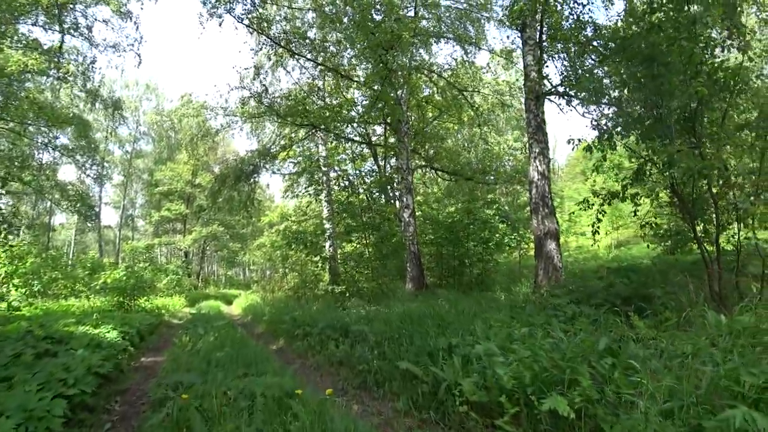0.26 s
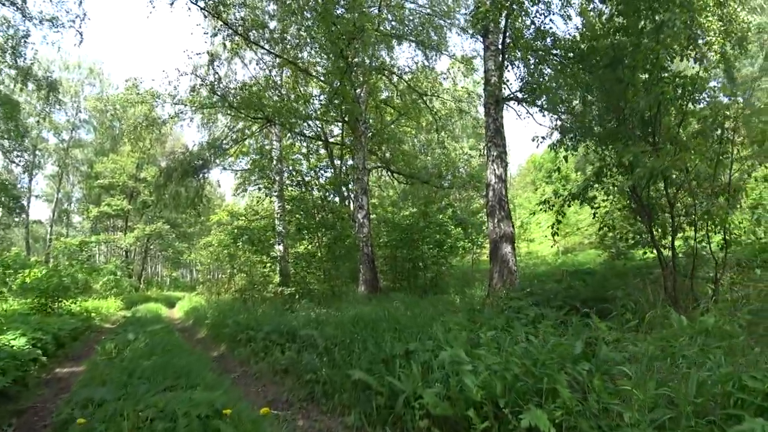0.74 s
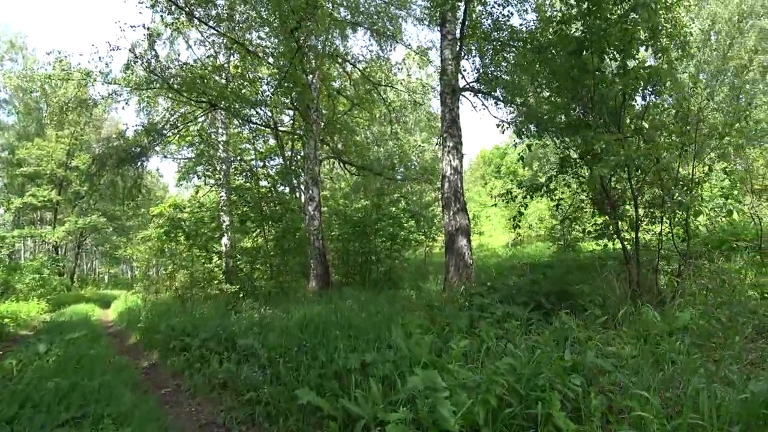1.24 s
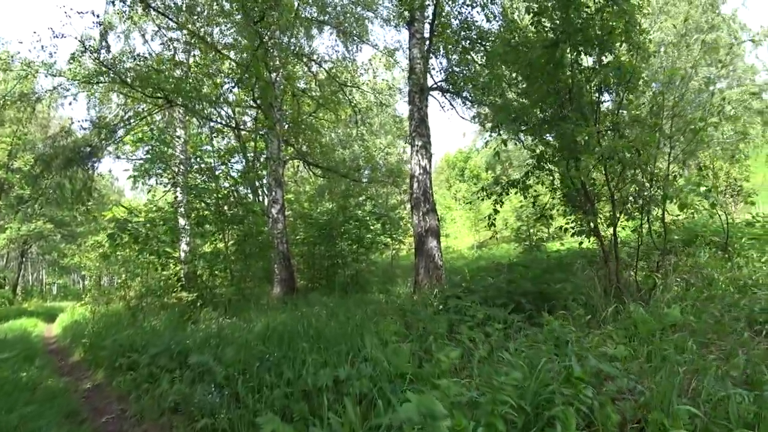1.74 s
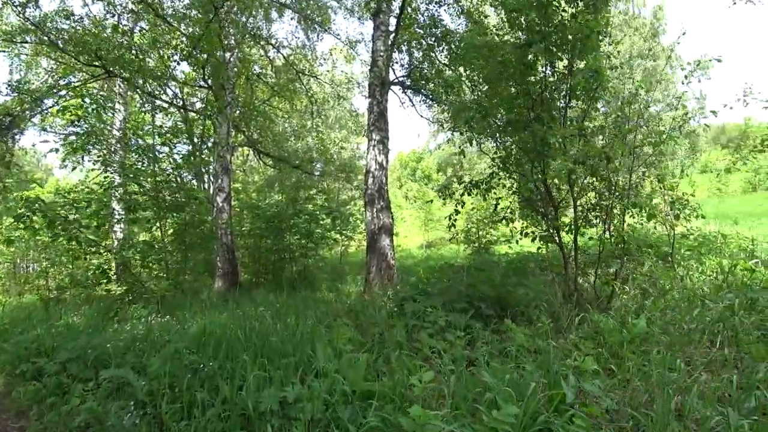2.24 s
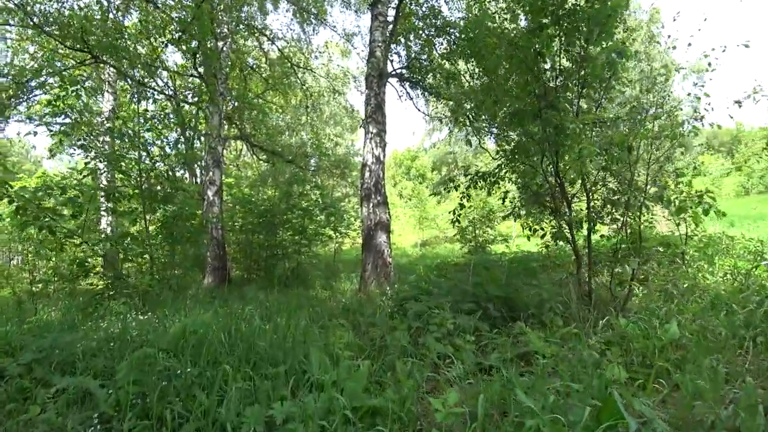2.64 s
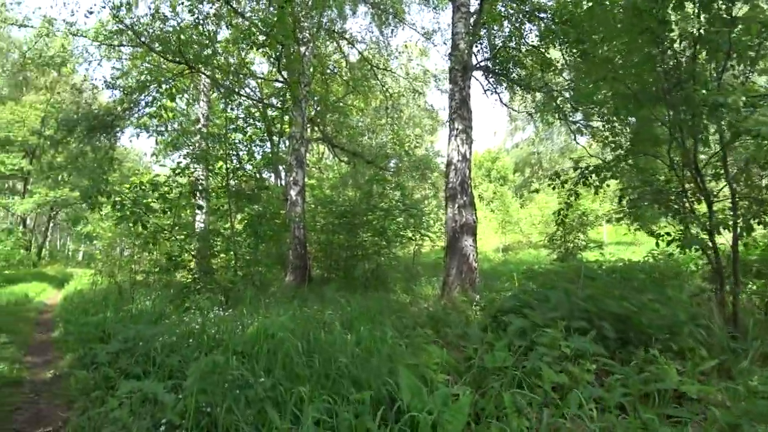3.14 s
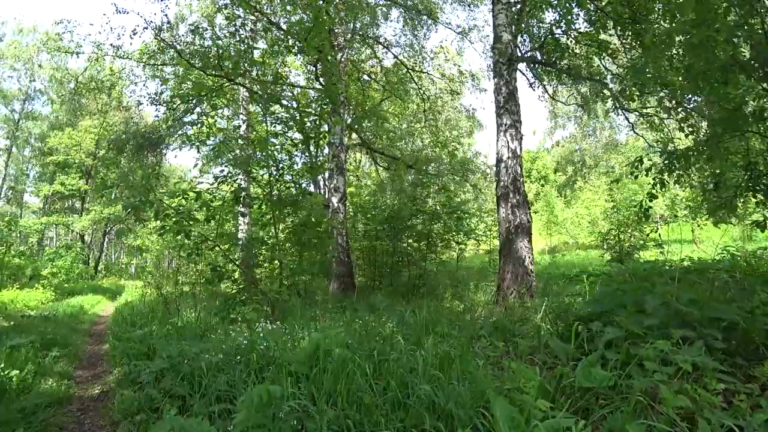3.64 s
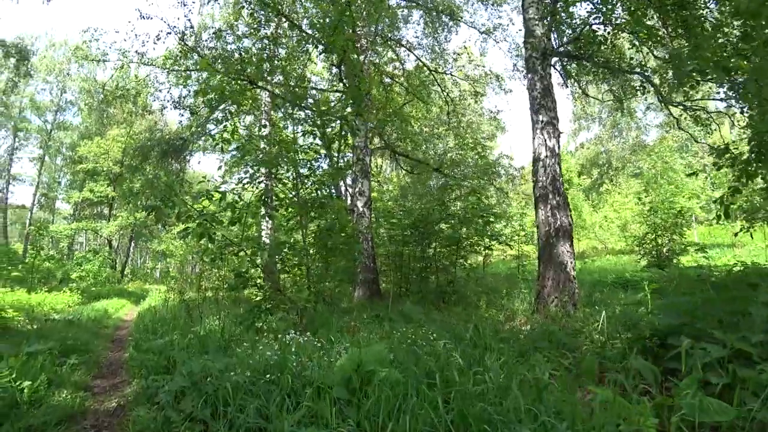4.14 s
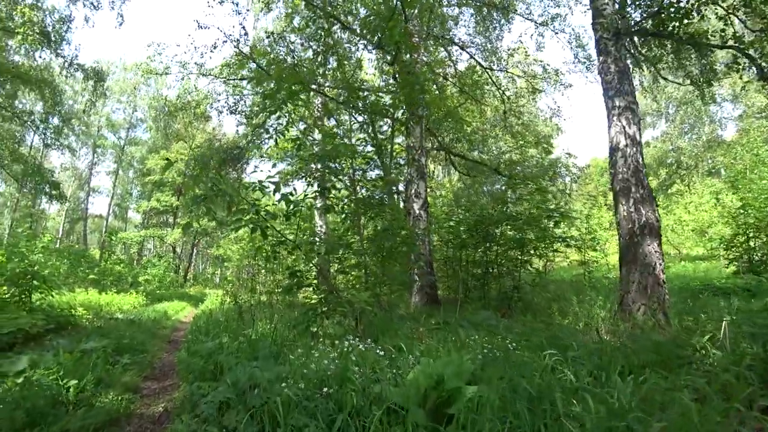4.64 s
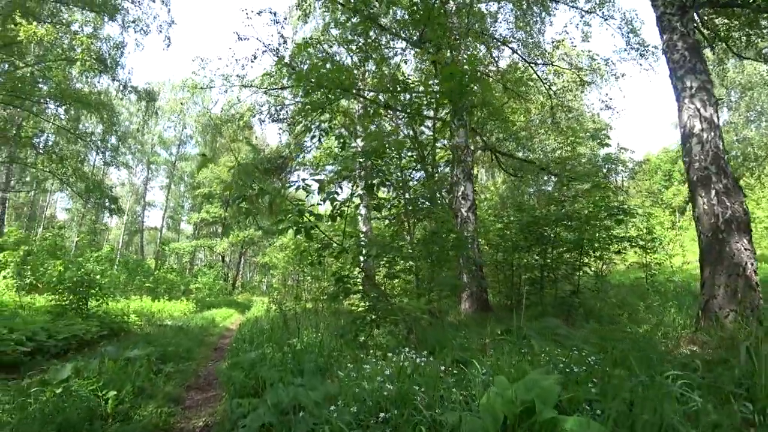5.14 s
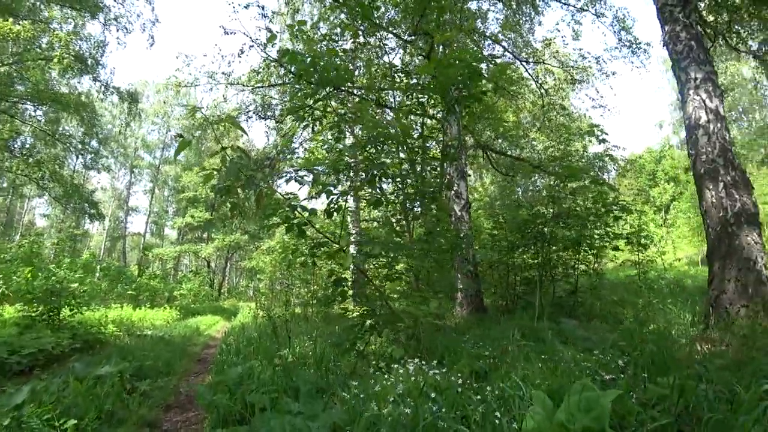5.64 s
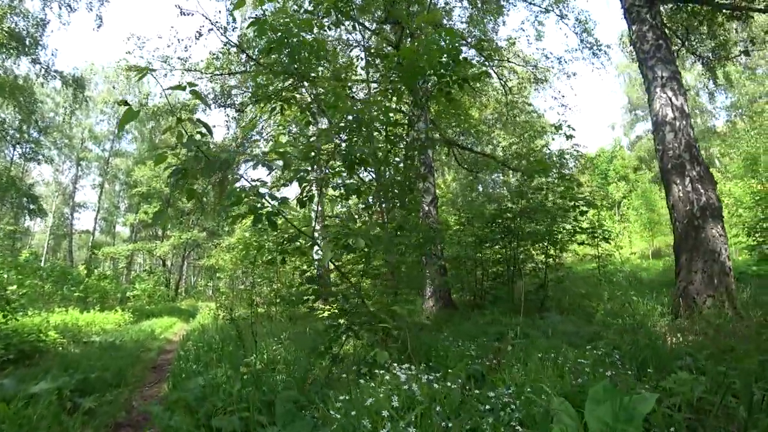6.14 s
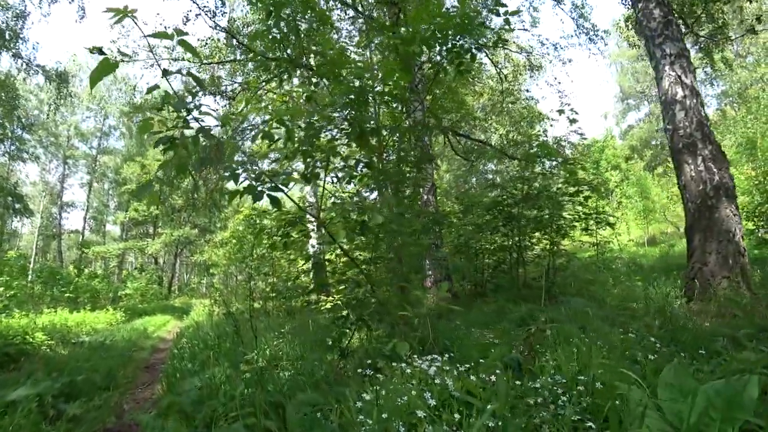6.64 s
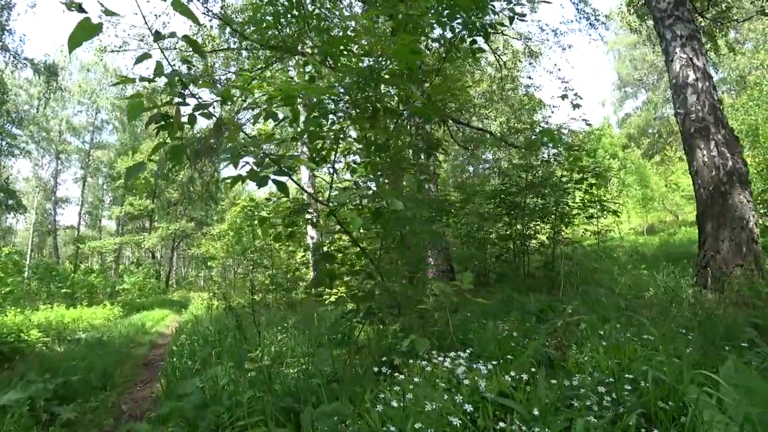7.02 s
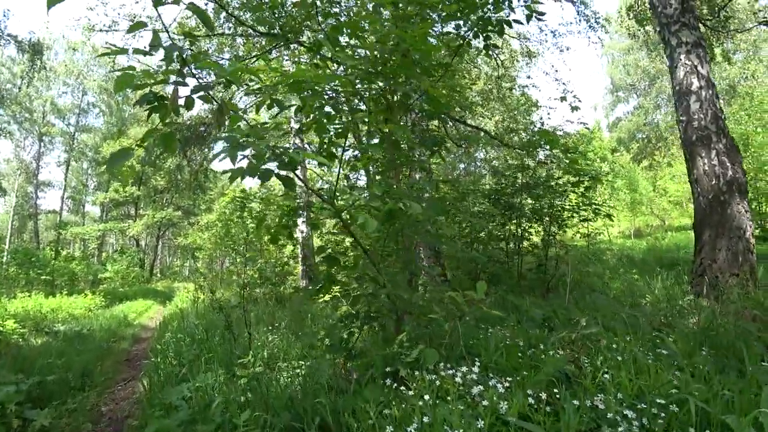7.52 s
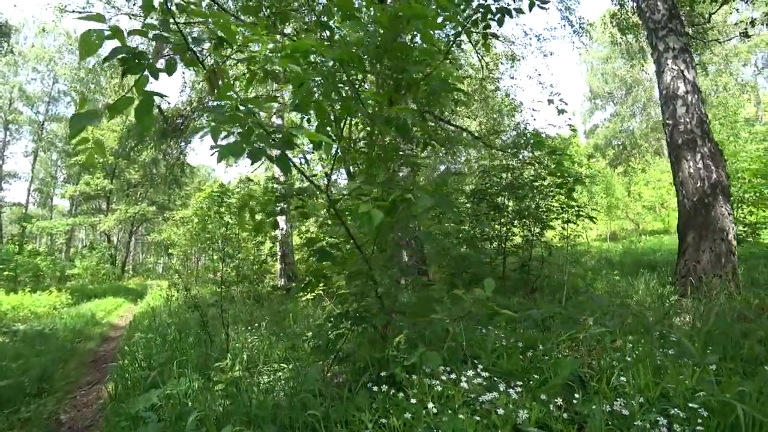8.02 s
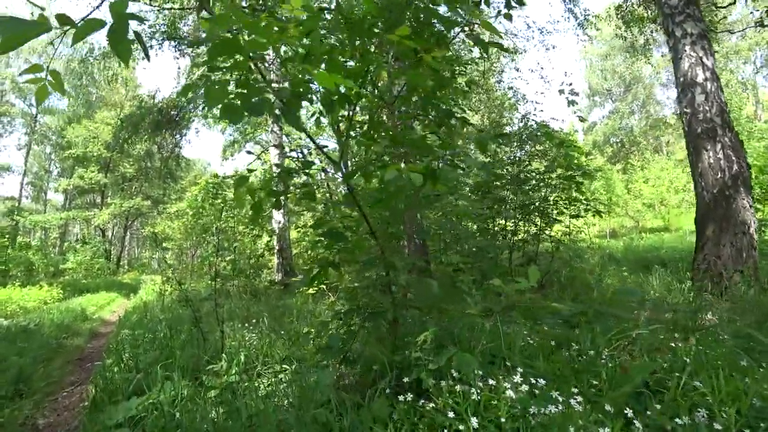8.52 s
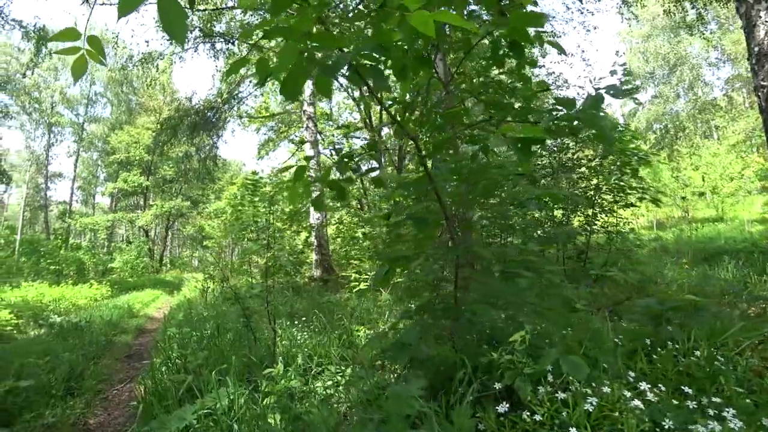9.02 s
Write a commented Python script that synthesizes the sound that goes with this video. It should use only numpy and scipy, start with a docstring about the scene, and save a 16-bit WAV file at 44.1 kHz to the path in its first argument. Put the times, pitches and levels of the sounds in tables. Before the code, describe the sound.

Someone wades through tall grass at the edge of a wood, heard from a hand-held stereo microphone just above the plants. From the start, blades hiss and leaves rustle against the legs while stems snap crisply. The wading is busiest from about 1.3 to 2.6 seconds, with dry litter and twigs crunching underfoot. Around 3 seconds a distant bird gives one faint, falling whistle during another swish, and stems crack at 3.4. From about 3.7 seconds the movement slows to light brushes, with a small snap at 4.5. Careful steps crunch twigs and stems at about 6.2, 6.5 and 7.1 seconds. Soft, low handling bumps follow from 7.3 to 7.8, and again at 9.2. Fainter crunches come between 8.5 and 9.1 seconds. Throughout, wind washes softly and evenly through far treetops, and a very faint, high electronic whine sits at the microphone.

```python
"""The edge of a wood, in tall grass, heard from the stereo microphone of a hand-held camera.
Just below it someone wades through the plants, then slows to a few careful steps: blades hiss and
leaves rustle against the legs, stems snap, and dry litter and twigs crunch under the soles.
Right at the microphone the camera whines and is bumped softly by the hand.
Far off, wind washes through the trees and a bird whistles once."""
import sys
import numpy as np
from scipy import signal
from scipy.fft import rfft, irfft
from scipy.io import wavfile
from scipy.ndimage import uniform_filter1d

SR = 44100
rng = np.random.default_rng(int(sys.argv[2]) if len(sys.argv) > 2 else 0)


def master_out(mix):
    """Clip the mix to full scale and print it as 16-bit PCM to the path in sys.argv[1]."""
    frames = np.transpose(np.atleast_2d(mix))
    ceiling = np.clip(frames, -1, 1)
    pcm = np.round(ceiling * 32767).astype(np.int16)
    wavfile.write(sys.argv[1], SR, pcm)


N = 408807
TIME, FREQS = np.arange(N) / SR, np.fft.rfftfreq(N, 1 / SR)


# a leg sweeps through the plants: (start [s], length [s], level [dB], blades over leaves [dB])
LEG_SWEEPS = [(0.1, 0.02, -49, -2), (0.22, 0.027, -52, -10), (0.326, 0.025, -50.5, 2),
              (0.408, 0.22, -50.5, 2), (0.654, 0.28, -49, 0), (0.664, .025, -49, -1),
              (0.953, 0.17, -58, -2), (1.238, 0.05, -55, 5), (1.282, 0.13, -46.5, 3.5),
              (1.346, 0.18, -45, -1), (1.546, 0.17, -44.7, -4), (1.707, 0.12, -46, -1),
              (1.86, 0.27, -52, 2), (1.99, 0.019, -43.5, 8), (2.14, 0.31, -46, -3),
              (2.466, 0.11, -48.5, -5), (3.014, 0.28, -47.5, 7), (3.249, 0.16, -46.5, 2.5),
              (3.425, 0.23, -60, 6), (3.754, 0.34, -62, -4), (4.141, 0.022, -55, -3),
              (4.478, 0.024, -51.5, -2.5), (4.67, 0.088, -58.5, 17), (5.329, 0.065, -54, -8),
              (5.41, 0.1, -57.5, -7), (5.767, 0.031, -54, 6), (6.422, 0.073, -50, -3),
              (6.51, 0.13, -65, -12), (6.973, 0.039, -53.5, 7), (7.127, .065, -52, -10),
              (7.766, 0.046, -58, -4), (8.983, 0.037, -51, -6), (9.042, 0.28, -60.5, -13)]
# a foot presses a tuft flat: (heaviest moment [s], level [dB], blades over leaves [dB])
TUFT_TREADS = [(1.485, -44.5, 15), (2.237, -40, -0.5), (6.213, -47, -11), (7.07, -46, -5)]

def contacts(attack_s=0.021, swell_db_per_s=0.5, release_s=0.028, press_s=0.052, ease_s=0.066):
    """Yields each touch of the plants as (amplitude over time, blades over leaves [dB])."""
    stirring_db = np.interp(TIME, (3.5, 4.7), (-58.5, -71.5))  # constant stir, less as the wading slows
    yield gain_of(stirring_db), -5
    for start, length, db, blades_db in LEG_SWEEPS:
        t = np.maximum(TIME - start, 0)
        catch = np.minimum(t / attack_s, 1)
        spring_back = np.exp(-np.maximum(t - length, 0) / release_s)
        yield catch * spring_back * gain_of(db + swell_db_per_s * (t - length / 2)), blades_db
    for s, db, blades_db in TUFT_TREADS:
        pressure = np.exp(np.minimum((TIME - s) / press_s, (s - TIME) / ease_s))
        yield gain_of(db) * pressure, blades_db


# thin grass blades, close up: (frequency [Hz], gain [dB])
BLADE_COLOUR = [(300, -54), (1500, -23), (3500, -5), (5500, -2.5), (7200, -0.5), (8200, -3), (9200, -6),
                (11000, -9)]
# broad leaves, close up: (frequency [Hz], gain [dB])
LEAF_COLOUR = [(80, -55), (200, -18.5), (500, -11), (1100, -2), (2000, -1.5), (3300, -0.5), (5000, -5),
               (7500, -6.5), (11000, -22)]
# nearby plants at the two microphone ports: (frequency [Hz], left-right likeness [0..1])
NEAR_LIKENESS = [(100, 0.86), (600, 0.79), (1200, 0.84), (2800, 0.96), (6000, 0.93), (8500, 1),
                 (11000, 0.39)]
# nearby plants reach the left port first: (frequency [Hz], phase lead [rad])
NEAR_LEAD = [(100, .1), (1000, 0.24), (2700, 0.12), (6500, .3), (8200, 0.97), (11000, 0.98)]

def brushing(swish_db=-0.11, tick_db=-64, tick_growth=0.59, usual_db=-50):
    """Blades hiss and leaves rustle against the legs; in gentle contact single stalks tick out."""
    blade_power, leaf_power = np.zeros((2, N))
    for level, blades_db in contacts():
        leaf_share = 1 / (1 + gain_of(blades_db) ** 2)
        blade_power += (1 - leaf_share) * level ** 2
        leaf_power += leaf_share * level ** 2
    strength_db = 10 * np.log10(blade_power + leaf_power)
    blades = rustle(BLADE_COLOUR, per_s=2200, spread_db=1.3, ring_s=0.00018, rub_db=-0.5)
    leaves = rustle(LEAF_COLOUR, per_s=2000, spread_db=4.0, ring_s=0.00096, rub_db=2.5)
    stalks = ports(grains(per_s=220, spread_db=4.5, ring_s=0.00017), BLADE_COLOUR, NEAR_LIKENESS)
    swish = gain_of(swish_db) * (np.sqrt(blade_power) * blades + np.sqrt(leaf_power) * leaves)
    return swish + stalks * gain_of(tick_db + tick_growth * (strength_db - usual_db))


def rustle(colour, per_s, spread_db, ring_s, rub_db, clump_db=1.5):
    """Grains over smooth rubbing, arriving in clumps as tufts catch and slip free."""
    friction = grains(per_s, spread_db, ring_s) + gain_of(rub_db) * rng.standard_normal((2, N))
    clumped = tuft_patches(friction) * gain_of(clump_db * drift(rate_hz=38))
    return ports(clumped, colour, NEAR_LIKENESS, curve(NEAR_LEAD))


def grains(per_s, spread_db, ring_s, fibre_kinds=16):
    """Tiny slips and fractures of uneven size; every kind of fibre has its own brief ring."""
    t, out = np.arange(256) / SR, np.zeros((2, N))
    for _ in range(fibre_kinds):
        slips = rng.random(N) < per_s / fibre_kinds / SR
        clicks = slips * gain_of(spread_db * np.minimum(rng.exponential(1, N), 4))
        rings = unit_rms(rng.standard_normal((2, len(t))) * np.exp(-t / ring_s))
        out += signal.oaconvolve(clicks[None], rings, axes=1)[:, :N]
    return unit_rms(out - out.mean(1, keepdims=True))


def tuft_patches(x, patchy_db=1.5):
    """Each tuft has a colour of its own: random patches, about 15 ms long and 1.5 kHz wide."""
    spectra = signal.stft(x, nperseg=256)[2]
    patches = rng.standard_normal((spectra.shape[2], spectra.shape[1]))
    patches = uniform_filter1d(patches, size=5, axis=0)  # along time
    patches = uniform_filter1d(patches, size=9, axis=1)  # along frequency
    return signal.istft(spectra * gain_of(patchy_db * unit_rms(patches).T), nperseg=256)[1][:, :N]


# stems snap around the legs: (time [s], level [dB], pitch [Hz])
STEM_SNAPS = [(0.223, -35, 4500), (0.232, -35, 5500), (.501, -35, 2200), (.6704, -28, 5800),
              (.759, -26, 4300), (0.785, -24.5, 3500), (.798, -33, 2300), (.941, -28.5, 2880),
              (1.073, -34, 9000), (1.0894, -25, 4170), (1.155, -32, 9000), (1.203, -32, 5300),
              (1.638, -27, 4000), (1.656, -25, 2800), (1.797, -25.5, 2400), (1.807, -29, 3000),
              (1.8448, -23.5, 3600), (1.8482, -26, 4200), (1.946, -25, 5400), (2.02, -34, 7000),
              (2.895, -33, 6000), (3.296, -29, 4200), (3.4061, -24, 4000), (3.4108, -29, 6500),
              (3.416, -30, 7000), (3.4161, -25, 5000), (3.486, -36, 6500), (3.557, -30, 4500),
              (3.5883, -31, 5000), (4.4893, -30, 4620), (6.2116, -26, 3360), (6.2258, -27, 3400),
              (6.451, -29, 7500), (6.454, -26, 6500), (6.49, -36, 4500), (6.491, -37, 3200),
              (6.532, -34, 4500), (7.0534, -23.5, 6960), (7.0955, -31, 3800), (7.142, -24, 7000)]

def snapping_stems(cycles=0.82, splinter_db=-15, splinter_s=0.0015, right_db=-3.0):
    """A stem gives way in a crack of a few cycles, and its fibres splinter for some milliseconds."""
    t, left = np.arange(900) / SR, np.zeros(N)
    for s, db, hz in STEM_SNAPS:
        crack = np.cos(2 * np.pi * hz * t) * t * np.exp(-2 * t * hz / cycles)
        splinters = gain_of(splinter_db) * rng.standard_normal(len(t)) * np.exp(-t / splinter_s)
        add(left, s + 0.00106, gain_of(db) * (crack / abs(crack).max() + splinters))
    left = low_cut(left, hz=900)
    right = irfft(rfft(left) * np.exp(-1j * curve(NEAR_LEAD)), N)
    return np.array([left, gain_of(right_db) * right])


# a sole crushes dry litter: (heaviest moment [s], level [dB], half-length [s], pitch [Hz])
LITTER_CRUNCHES = [(1.308, -48.5, 0.012, 1210), (1.649, -51.5, 0.02, 2320), (1.746, -49.5, 0.02, 1700),
                   (2.07, -54.5, 0.053, 830), (2.17, -51, .008, 850), (2.239, -49, 0.03, 950),
                   (2.242, -54, 0.02, 266), (2.536, -54, 0.019, 1400), (2.609, -59.5, 0.019, 430),
                   (6.243, -51, 0.02, 1050), (7.093, -46, 0.018, 1480), (8.502, -57, 0.014, 650),
                   (8.771, -57.5, 0.043, 836), (9.104, -57, 0.053, 1180)]
# litter on the ground, heard from hand height: (frequency [Hz], gain [dB])
LITTER_COLOUR = [(60, -33), (200, 2), (500, 12.5), (1000, 6), (1800, 10.5), (3500, 12), (6000, -4),
                 (11000, -7)]

def crunching_litter(slip_s=0.0051, cycles=2.5, scatter=0.21, size_db=0.5, grit=0.33, slips=90):
    """Litter gives way in a quick, uneven run of gritty knocks; softer ground sounds lower."""
    t, out = np.arange(400) / SR, np.zeros((2, N))
    for s, db, half, hz in LITTER_CRUNCHES:
        span = np.arange(-4 * half, 4 * half, 1 / SR)
        weight = np.exp(-.5 * (span / half) ** 2)
        for side in out:
            run = np.zeros(len(span))
            for k, (late, detune, size) in enumerate(rng.standard_normal((slips, 3))):
                tone = np.sin(2 * np.pi * hz * np.exp(scatter * detune) * t)
                knock = (tone + grit * rng.standard_normal(len(t))) * np.exp(-t * hz / cycles)
                add(run, slip_s * (k + 0.312 * late), gain_of(size_db * size) * knock)
            crunch = unit_rms(run * weight) * np.sqrt(np.mean(weight ** 2))
            add(side, s + span[0], gain_of(db) * crunch)
    return np.std(out) * ports(out, LITTER_COLOUR, NEAR_LIKENESS, curve(NEAR_LEAD))


# dead twigs break underfoot: (time [s], level [dB], pitch [Hz])
TWIG_BREAKS = [(1.5458, -33, 1500), (1.6452, -29, 1900), (3.407, -38, 1900), (3.4172, -33, 2210),
               (4.49, -36, 2100), (4.497, -42, 1000), (6.2046, -35, 1250), (6.229, -33, 1300),
               (6.2337, -30.5, 1250), (6.238, -34, 1140), (6.245, -35, 950), (6.5543, -37.5, 1190),
               (7.0677, -38, 1700), (7.072, -35, 2050), (7.075, -33, 1250), (7.0887, -35, 1520),
               (7.0955, -32, 1670), (7.1035, -37.5, 800), (7.1066, -37, 1380), (7.1093, -36, 1050),
               (7.1268, -41, 1500), (7.135, -38, 1430), (7.1442, -32, 1350), (8.4792, -41, 650)]

def breaking_twigs(cycles=1.16, grit=0.14, right_db=-2):
    """A dead twig breaks under the sole: a woody knock of two or three cycles, muffled by the foot."""
    t, out = np.arange(400) / SR, np.zeros((2, N))
    for s, db, hz in TWIG_BREAKS:
        swell = t * np.exp(-2 * t * hz / cycles)
        for side in out:
            fibres = unit_rms(uniform_filter1d(rng.standard_normal(len(t)), size=6))
            knock = np.sin(2 * np.pi * hz * t) + grit * fibres
            add(side, s, gain_of(db) * swell / swell.max() * knock)
    return low_cut(out, hz=220) * gain_of([[0], [right_db]])


def wood_echo(x, t60_s=0.4, echoes_per_s=2000):
    """Trunks and foliage scatter back a thin tail, different at each port."""
    t = np.arange(SR // 2) / SR
    echoes = rng.standard_normal((2, len(t))) * (rng.random((2, len(t))) < echoes_per_s / SR)
    tail = echoes * gain_of(-60 * t / t60_s)
    return signal.fftconvolve(x, tail / np.linalg.norm(tail[0]), axes=1)[:, :N]


# the hand shifts, right at the microphone: (time [s], level [dB], pitch [Hz], length [s])
HAND_BUMPS = [(7.258, -47, 131, 0.047), (7.355, -54, 125, 0.066), (7.44, -54, 103, 0.077),
              (7.525, -65, 97, .06), (7.77, -69, 103, 0.058), (9.215, -61, 72, 0.054)]

def handling(overtone_db=-2, right_lag_s=0.0014, roughness=0.19):
    """The grip slips: a short, low creak of the camera body, sagging in pitch, left port first."""
    out = np.zeros((2, N))
    for s, db, hz, length in HAND_BUMPS:
        progress = np.arange(0, 2, 1 / (length * SR))
        phase = 2 * np.pi * hz * length * (progress - 0.1 * progress ** 2)
        grip = 1 + roughness * unit_rms(uniform_filter1d(rng.standard_normal(len(progress)), size=200))
        swell = grip * np.minimum(progress / 0.12, 1) * np.exp(-(progress / 0.56) ** 3)
        creak = gain_of(db) * swell * (np.sin(phase) + gain_of(overtone_db) * np.sin(2 * phase))
        add(out[0], s, creak)
        add(out[1], s + right_lag_s, creak)
    return out


# wind in distant treetops: (frequency [Hz], gain [dB])
TREETOP_COLOUR = [(15, -60), (25, -35), (100, -21), (140, -17), (267, -12.5), (319, -9.5), (500, -4),
                  (640, -2), (830, -1), (1000, -1.9), (1300, -3.5), (3320, -9), (8530, -20), (9200, -23),
                  (11000, -27), (14300, -89), (22000, -120)]
# moving air at the two ports: (frequency [Hz], left-right likeness [0..1])
WIND_LIKENESS = [(60, 0.96), (200, 0.84), (400, 0.83), (700, 0.64), (1200, 0.56), (2200, 0.21),
                 (4000, 0.55), (11000, 0.47)]
# a draught on the microphone itself: (frequency [Hz], gain [dB])
DRAUGHT_RUMBLE = [(15, -6), (40, -6), (90, 1), (200, -3), (600, -50), (2000, -80)]
# puffs of air on the microphone: (time of peak [s], level [dB], half-length [s])
AIR_PUFFS = [(7.25, -88, .2), (9.27, -75, 0.29)]

def wind(trees_db=-53, still_air_db=-104):
    """The even wash of far treetops, and a faint draught on the microphone."""
    swell_db = .2 * drift(rate_hz=3)
    trees = ports(rng.standard_normal((2, N)), TREETOP_COLOUR, WIND_LIKENESS, lead_rad=0.3)
    draught = ports(rng.standard_normal((2, N)), DRAUGHT_RUMBLE, WIND_LIKENESS)
    puffs = sum(gain_of(db) * np.exp(-.5 * ((TIME - s) / half) ** 2) for s, db, half in AIR_PUFFS)
    return trees * gain_of(trees_db + swell_db) + draught * (gain_of(still_air_db) + puffs)


# the course of a distant bird's note: (time [s], pitch [Hz], level [dB])
BIRD_NOTE = [(2.925, 3400, -72), (2.955, 3410, -61), (3.04, 3340, -58.5), (3.14, 3270, -61),
             (3.19, 3180, -70)]

def bird():
    """One thin, falling whistle from far off."""
    s, hz, db = np.transpose(BIRD_NOTE)
    level = gain_of(np.interp(TIME, s, db)) * (TIME > s[0]) * (TIME < s[-1])
    return level * np.sin(2 * np.pi * np.cumsum(np.interp(TIME, s, hz)) / SR)


# the camera's electronics, beside the microphone: (frequency [Hz], level [dB])
WHINE_TONES = [(8950, -79.3), (9000, -79.3)]

def camera_whine():
    """A thin electronic whine of two close tones."""
    waver_rad = .2 * drift(rate_hz=5)
    return sum(gain_of(db) * np.sin(2 * np.pi * hz * TIME + waver_rad) for hz, db in WHINE_TONES)


def ports(pair, colour, likeness, lead_rad=0):
    """Colours two unrelated signals and blends them into left and right ports; their mean has rms 1."""
    left, unrelated = rfft(pair) * gain_of(curve(colour))
    same = np.clip(curve(likeness), -1, 1)
    right = (same * left + np.sqrt(1 - same ** 2) * unrelated) * np.exp(-1j * lead_rad)
    out = irfft(np.array([left, right]), N)
    return out / np.std(out.mean(0))


def drift(rate_hz):
    """A random wander of rms 1 that rolls off above the given rate."""
    return unit_rms(irfft(rfft(rng.standard_normal(N)) / (1 + (FREQS / rate_hz) ** 4), N))


def curve(points):
    """Spreads a table over FREQS on a log-frequency axis."""
    hz, value = np.transpose(points)
    return np.interp(np.log(FREQS + 1), np.log(hz + 1), value)


def low_cut(x, hz):
    """Second-order high-pass."""
    return signal.sosfilt(signal.butter(2, hz, "high", fs=SR, output="sos"), x)


def add(mix, s, sound):
    """Mixes a sound in at time s."""
    part = mix[max(round(s * SR), 0):][:len(sound)]
    part += sound[:len(part)]


def gain_of(db):
    """Decibels to amplitude."""
    return 10 ** (np.asarray(db) / 20)


def unit_rms(x):
    """Scales to rms 1."""
    return x / np.sqrt(np.mean(x ** 2) + 1e-20)


def scene():
    """The walker is just below the microphone and a little to the left; the wood lies beyond."""
    plants = (brushing() + crunching_litter()) * gain_of([[1], [-1]])
    walker = plants + snapping_stems() + breaking_twigs()
    echo = gain_of(-13.0) * wood_echo(walker)
    air = wind() * gain_of([[.35], [-.35]])
    return walker + echo + air + handling() + bird() + camera_whine()


def record(dry):
    """The camera's recorder cuts off steeply above about 11 kHz."""
    band_limit = signal.firwin(801, 11140, window=("kaiser", 8), fs=SR)
    return signal.oaconvolve(dry, band_limit[None], "same")


dry = scene()
out = record(dry)
master_out(out)
```